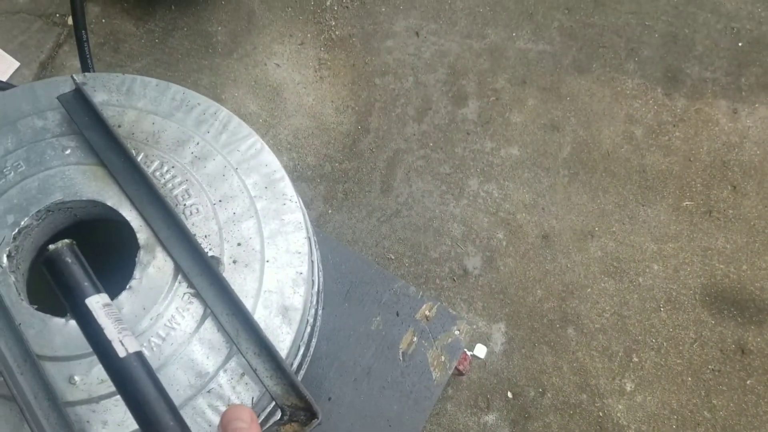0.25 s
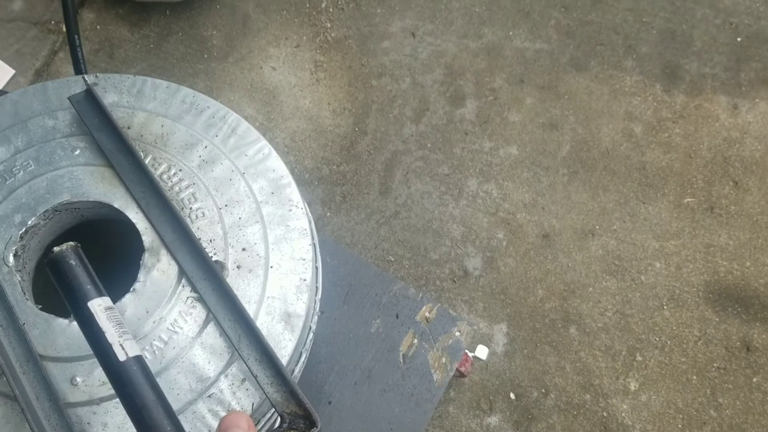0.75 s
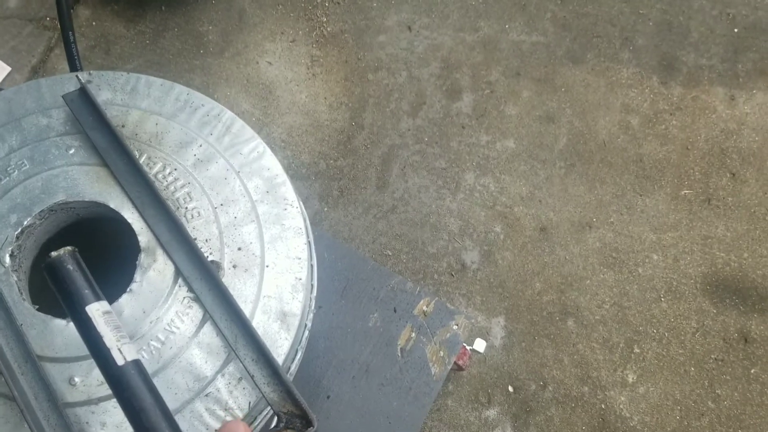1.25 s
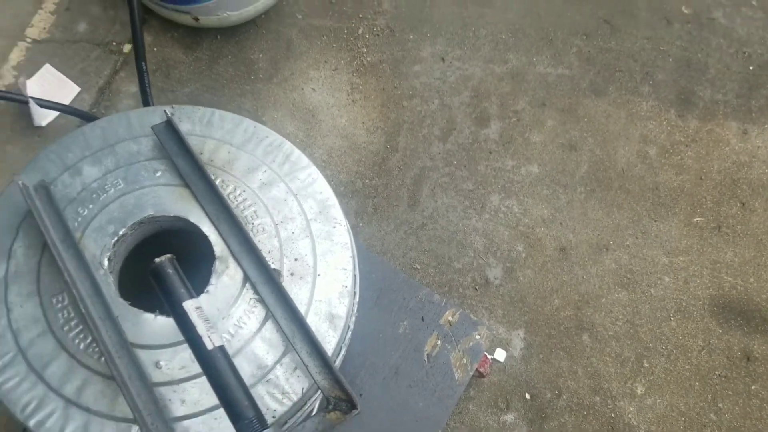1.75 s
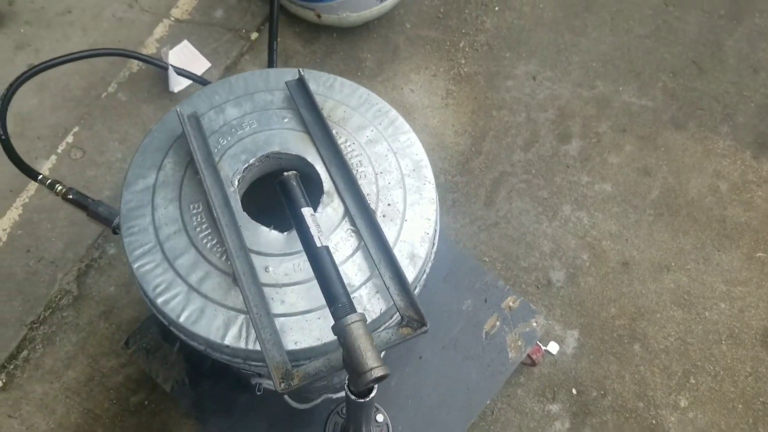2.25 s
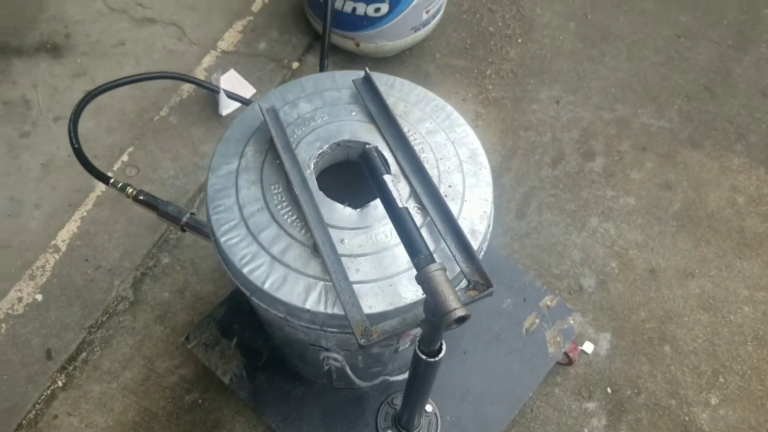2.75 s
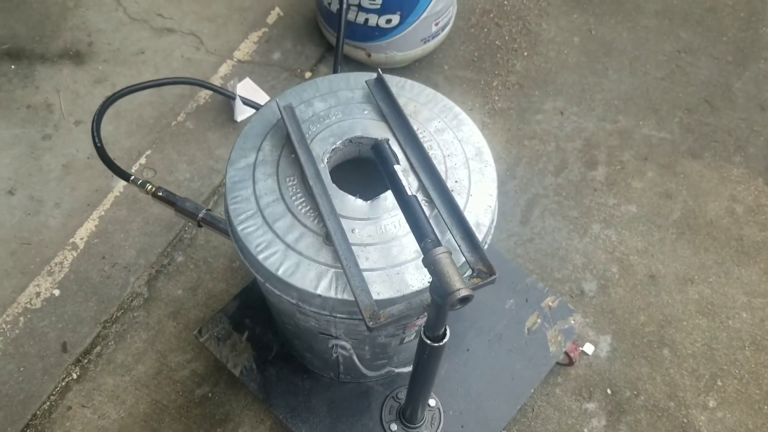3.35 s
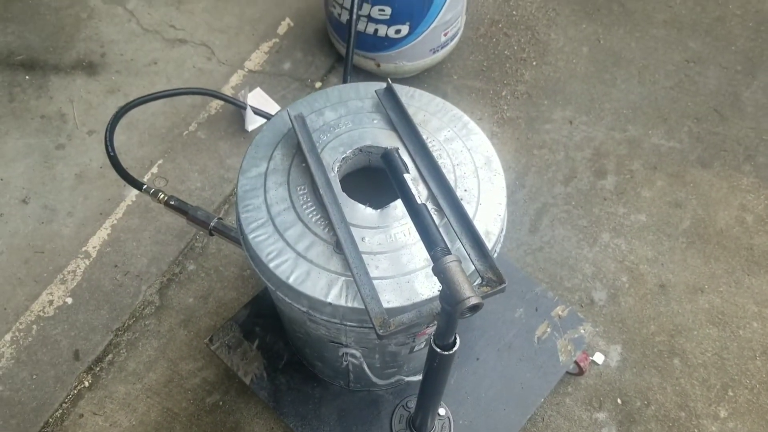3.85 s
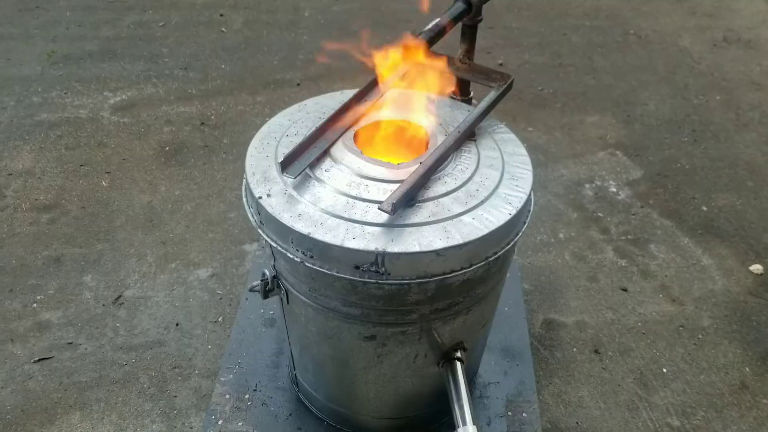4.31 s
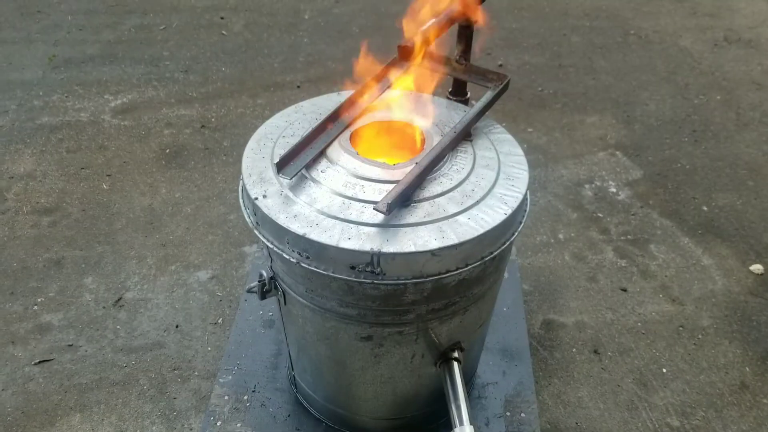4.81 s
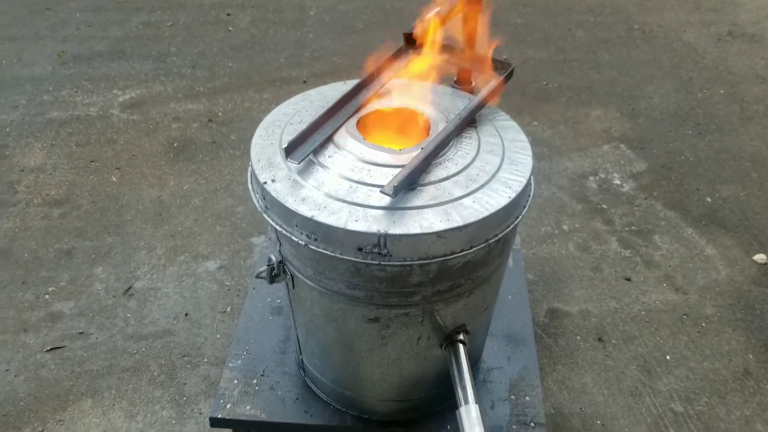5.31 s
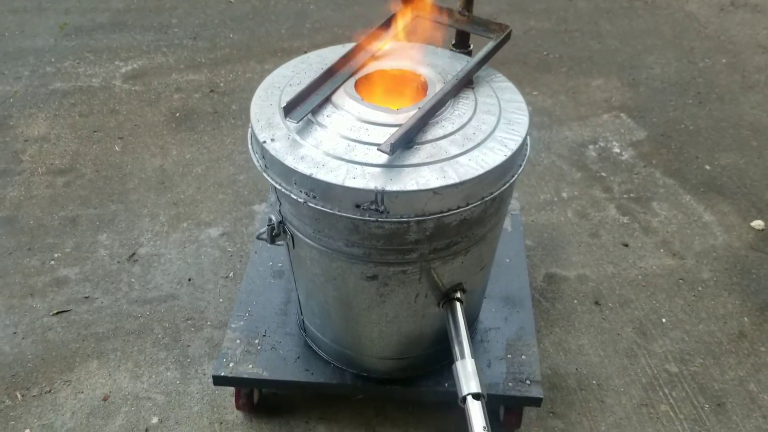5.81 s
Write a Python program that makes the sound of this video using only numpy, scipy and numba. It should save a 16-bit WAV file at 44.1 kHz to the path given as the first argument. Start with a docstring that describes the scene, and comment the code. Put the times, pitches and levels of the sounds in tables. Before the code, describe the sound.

A gas burner roars steadily inside a small metal drum furnace, hollow and low; shoes scuff concrete, then after a brief gap it roars brighter.

```python
"""A propane burner blows into a small insulated steel drum furnace outdoors, heard by a hand-held phone.
The first shot hears it from above: flame noise rings the drum's cavity over rumble, overtones, rush and jet hiss.
The phone steps back while shoes scuff the concrete, and a thin band of intake hiss comes up.
After a short silence the second shot hears the hotter furnace from the side.
Filtered noise makes every layer; the two ports differ in phase, level and scattered sound."""
import sys
import numpy as np
from scipy import signal
from scipy.fft import rfft, irfft, next_fast_len
from scipy.io import wavfile
from scipy.ndimage import uniform_filter1d, map_coordinates
from numba import njit

SR = 44100
rng = np.random.default_rng(int(sys.argv[2]) if len(sys.argv) > 2 else 0)


def waveform_to_disk(signal):
    """Save audio, clipped to [-1, 1], as 16-bit WAV at the path in sys.argv[1]."""
    frames = np.transpose(np.atleast_2d(signal))
    scaled = np.clip(frames, -1, 1) * 32767
    samples = np.round(scaled).astype(np.int16)
    wavfile.write(sys.argv[1], SR, samples)


N = 267687


def undb(db):
    """Level: decibels to an amplitude ratio."""
    return 10 ** (np.asarray(db) / 20)


def unit(x):
    """Normalization: scale to an rms of 1."""
    return x / np.sqrt(np.mean(x ** 2))


def read(table, hz):
    """Spectral interpolation: straight lines over logarithmic frequency."""
    points = np.array(table, float)
    return np.interp(np.log(np.maximum(hz, 1)), np.log(points[:, 0]), points[:, 1])


@njit
def svf(x, hz, width_hz):
    """Resonance: a state-variable band-pass with a moving centre, gain 1 there."""
    y, band, low = np.empty(len(x)), 0., 0.
    for i in range(len(x)):
        g = np.tan(np.pi * hz[i] / SR)
        damping = width_hz / hz[i]
        v = (band + g * (x[i] - low)) / (1 + g * (g + damping))
        band, low = 2 * v - band, low + 2 * g * v
        y[i] = damping * v
    return y


def resonate(ports, centre_hz, width_hz, passes):
    """Cascaded resonance: each pass steepens the skirts at both ports; the width is that of one pass."""
    centre = np.full(ports.shape[1], centre_hz, float)
    for _ in range(passes):
        ports = np.array([svf(port, centre, float(width_hz)) for port in ports])
    return ports


def walk(n, rate):
    """Slow random modulation: levels held 1 / rate s and slewed twice; spread 1."""
    hold = int(SR / rate)
    steps = np.repeat(rng.standard_normal(n // hold + 1), hold)
    slewed = uniform_filter1d(uniform_filter1d(steps, hold), hold)[:n]
    return slewed / slewed.std()


# Shoe scuffs; both levels are further weighted by the envelope's rms:
# (time [s], ring level [dB], length [s], ring centre [Hz], ring width of one pass [Hz],
#  rasp level [dB], left minus right [dB])
SCUFFS = [(1.780, -58, .003, 4500, 4000, -56, 0), (1.800, -55, .065, 2600, 3000, -64, -1),
          (1.814, -57, .008, 4000, 4000, -62, 0), (1.8355, -39, .004, 1800, 2200, -49, -2),
          (1.857, -60, .012, 4000, 4000, -60, -3), (2.237, -52, .004, 2500, 3000, -54, 1),
          (2.243, -67, .04, 7000, 4000, -62, 1), (2.7625, -46, .003, 2400, 2600, -62, -2),
          (2.758, -47, .021, 2520, 700, -66, -2), (2.770, -56, .009, 4550, 600, -66, -2),
          (2.773, -54, .005, 3300, 900, -66, -2), (2.8915, -36, .005, 1400, 900, -68, 2),
          (2.892, -42, .004, 2600, 900, -68, 2), (2.899, -47, .004, 2900, 1800, -54, 2),
          (2.901, -38, .009, 1550, 800, -57, 2), (2.914, -36, .024, 1500, 800, -58, 2),
          (2.918, -44, .016, 2550, 800, -64, 2), (2.918, -54, .03, 4400, 2500, -63, 1),
          (2.972, -53, .022, 1900, 1600, -70, 1)]


def scuffs():
    """Friction excitation: a sole drags over grit, uneven clicks with a ring and a bright rasp."""
    out, n = np.zeros((2, N)), SR // 5
    t = np.arange(n) / SR
    for s, ring_db, length, hz, width_hz, rasp_db, pan_db in SCUFFS:
        envelope = np.minimum(t / .001, 1) / (1 + (t / length) ** 4)
        grit = rng.standard_normal(n) + .7 * rng.standard_normal((2, n))  # shared plus each port's own
        grit = grit * undb(1.2 * rng.exponential(1, n))
        ring = envelope * resonate(grit, hz, width_hz, passes=2)
        rasp = envelope * resonate(grit, 5000, 4500, passes=1)
        pan = undb(np.array([[pan_db], [-pan_db]]) / 2)
        gain = pan * np.sqrt(np.mean(envelope ** 2))
        i = int(s * SR)
        out[:, i:i + n] += gain * (undb(ring_db) * unit(ring) + undb(rasp_db) * unit(rasp))
    return out


# Sound that reaches both ports straight from the furnace, one table a shot:
# (frequency [Hz], share of power [0-1])
DIRECT = [
    [(30, .92), (70, .97), (130, .99), (290, .985), (400, .8), (640, .8), (1400, .35), (3000, .5),
     (8000, .25), (15000, .15)],
    [(30, .94), (70, .98), (130, .995), (290, .995), (640, .92), (1400, .4), (2200, .7), (3000, .4),
     (8000, .25), (15000, .15)],
]
# Shading of the ports by the phone's body, one table a shot: (frequency [Hz], left minus right [dB])
SHADE = [
    [(60, 2), (110, 0), (200, -1), (380, 0), (700, 2), (1290, -3), (2380, -5), (4400, -2.5), (8120, -1),
     (15000, 1)],
    [(60, 1), (110, -5.5), (200, -3), (380, -2.5), (700, -3), (1290, -1), (2380, -8), (4400, -6.5),
     (8120, -4.5), (15000, -1.5)],
]


def eddies(n, shot):
    """Partial coherence: white turbulence as port spectra, a direct part in common and a scattered part."""
    hz = np.fft.rfftfreq(n, 1 / SR)
    share = read(DIRECT[shot], hz)
    direct, left, right = rfft(rng.standard_normal((3, n)))
    shade = undb(np.outer([.5, -.5], read(SHADE[shot], hz)))
    scattered = np.array([left, right])
    return hz, shade * (np.sqrt(share) * direct + np.sqrt(1 - share) * scattered)


def turbulence(n, shot, colour, shared_db, flicker_db, rate):
    """Turbulent noise: coloured octave bands share one level change and each flickers alone."""
    hz, noise = eddies(n, shot)
    lo, hi = colour[0][0], colour[-1][0]
    noise = noise * undb(read(colour, hz)) * (hz > lo / 2) * (hz < hi * 2)
    octave = np.clip(np.log2(np.maximum(hz, 1) / lo), 0, None)
    out = 0
    for k in range(int(np.log2(hi / lo)) + 2):
        band = np.clip(1 - abs(octave - k), 0, 1)  # triangles that overlap and sum to 1
        out = out + irfft(noise * band, n) * undb(shared_db + flicker_db * walk(n, rate))
    return unit(out)


def intake(n, shot, away):
    """Narrow-band noise: a thin band of hiss, heard once the burner pipe is in view."""
    hiss = irfft(eddies(n, shot)[1], n)
    hiss = unit(resonate(hiss, 3316, 200, passes=2))
    return np.sqrt(away) * undb(-66 + 1.8 * walk(n, 3)) * hiss


# Gas jet spectrum before levelling, one table a shot: (frequency [Hz], relative level per Hz [dB])
JET = [
    [(2800, -25.0), (3600, 0.0), (4300, -3.2), (5400, -5.6), (6500, -5.5), (7600, -4.5), (8800, -10.3),
     (10300, -6.7), (12200, -5.6), (14300, -6.4), (15000, -6.2), (15600, -3.3)],
    [(2800, -26), (3600, -1.5), (4200, -5.5), (4950, -10.5), (5500, -6.5), (6000, -3.5), (6700, -4),
     (7800, -5.5), (8800, -9.5), (10200, -4), (11300, -6.5), (12200, -2), (13200, -3.5), (14300, -3.5),
     (15600, 0)],
]


def jet(n, shot, flutter):
    """Jet noise: the gas stream mixes with air and hisses."""
    return turbulence(n, shot, JET[shot], 0.85 * flutter, 0.96, rate=9.2)


# Rush spectrum before levelling, one table a shot: (frequency [Hz], relative level per Hz [dB])
RUSH = [
    [(500, -18.5), (800, -8), (1250, -12), (2000, -13), (2600, -19.5), (3000, -23), (3600, -33.5),
     (4900, -59.5)],
    [(500, -0.5), (800, -22), (970, 5.5), (1130, -1), (1300, 1), (1600, 1), (1730, -0.5), (1860, 2),
     (2010, 5.5), (2095, -3.5), (2260, 3), (2380, 2), (2500, -4.5), (2800, -7.5), (3020, -6), (3250, -11.5),
     (3800, -34), (4900, -55)],
]


def rush(n, shot, flutter):
    """Broadband turbulence: the flame's rush in the middle of the spectrum."""
    return turbulence(n, shot, RUSH[shot], 0.81 * flutter, 1.0, rate=20)


# Overtone spectrum before levelling, one table a shot: (frequency [Hz], relative level per Hz [dB])
OVERTONES = [
    [(240, -37.5), (400, -23), (466, 2.5), (626, -2.5), (900, -19.5), (1170, -51.5), (1980, -120)],
    [(220, -12.5), (380, -7.5), (573, -10), (702, -15), (900, -15), (1170, -78), (1980, -120)],
]


def overtones(n, shot, flutter):
    """Upper resonances: flame noise with spectral peaks above the cavity's main ring."""
    return turbulence(n, shot, OVERTONES[shot], 0.53 * flutter, 1.0, rate=11)


# Rumble spectrum before levelling, one table a shot: (frequency [Hz], relative level per Hz [dB])
RUMBLE = [
    [(25, -36), (33, -24), (42, -12), (55, -4), (64, -7), (75, -1), (110, 0), (150, -3), (190, -3),
     (240, -8), (310, -35)],
    [(25, -38), (33, -26), (42, -14), (55, -5), (70, -4), (100, 0), (130, -5), (160, -8), (215, -2),
     (260, -10), (330, -35)],
]


def rumble(n, shot):
    """Combustion noise: low-frequency turbulence under the ring."""
    return turbulence(n, shot, RUMBLE[shot], 0, 0.46, rate=16)


# Cavity bandwidth, one value a shot: (width of one pass [Hz])
CAVITY_WIDTH_HZ = [111, 150]
# Cavity pitch that settles, one row a shot: (start [Hz], end [Hz])
CAVITY_HZ = [(303, 262.3), (314, 317)]
# Band cancelled by the bounce off the concrete, one row a shot:
# (centre [Hz], width [Hz], depth before the step back [0-1])
GROUND_DIP = [(388, 115, 0.8), (466, 73, 0)]
SETTLE_S = 0.44
DIP_LEFT = 0.59  # share of the dip that remains after the step back


def cavity(n, shot, s, away):
    """Cavity resonance: flame noise rings the air; pitch follows gas temperature and angle to the mouth."""
    start_hz, end_hz = CAVITY_HZ[shot]
    settling = np.exp(-((s - s[0]) / SETTLE_S) ** 2 / 2)
    ring_hz = end_hz + (start_hz - end_hz) * settling
    noise = irfft(eddies(n, shot)[1], n)
    ring = resonate(noise, ring_hz, CAVITY_WIDTH_HZ[shot], passes=3)
    dip_hz, dip_width_hz, depth = GROUND_DIP[shot]
    depth = depth * (1 - away * (1 - DIP_LEFT))
    ring = ring - depth * resonate(ring, dip_hz, dip_width_hz, passes=1)
    return unit(ring * undb(0.31 * walk(n, 17)))


# Right port's lag and loss beside the left, one row a shot: (lag [ms], left minus right [dB])
TURN = [(0.25, 0.6), (0.108, 3.5)]
# The same after the step back: (lag [ms], left minus right [dB])
FACING = (0.069, .2)
TURN_IN_S, TURN_START_MS = 0.46, 0.13  # the phone first turns aside


def aim(x, shot, s, away):
    """Interaural-style cues: a time lag and a level difference place the furnace between the ports."""
    aside_ms = np.interp(s, [0, TURN_IN_S], [TURN_START_MS, TURN[shot][0]])
    lag_ms = aside_ms + away * (FACING[0] - aside_ms)
    pan_db = TURN[shot][1] + away * (FACING[1] - TURN[shot][1])
    heard_at = np.arange(len(s)) - lag_ms * SR / 1000
    x[1] = map_coordinates(x[1], [heard_at], order=5, mode="wrap")
    return x * undb(np.array([pan_db, -pan_db]) / 2)


# Shot bounds, one row a shot: (start [s], end [s])
SHOTS_S = [(0, 4.1930), (4.2866, 6.07)]
# Swell of the roar before each layer's share, one table a shot: (time [s], level [dB])
SWELL = [
    [(0, -1), (.5, -1), (.9, 3), (1.4, 2.5), (2, 2.5), (2.6, -3.5), (2.9, 0), (3.3, -2.5), (3.6, 0),
     (3.85, -1.5), (4.19, 0.5)],
    [(4.29, 2), (4.6, -2), (5, -0.5), (5.6, 0.5), (6.07, -1.5)],
]
# Base levels, one row a shot: (cavity [dB], rumble [dB], overtones [dB], rush [dB], jet [dB])
LAYER_DB = [(-19, -27, -42, -46, -57), (-19.5, -25, -36.5, -41, -47.5)]
# Share of the swell, one row a shot: (cavity [ratio], rumble [ratio], overtones [ratio],
# rush [ratio], jet [ratio])
FOLLOW = [(1, 0.2, 0.28, 0.49, .1), (1, 0.3, 0.22, 0.23, .1)]
# Change after the step back: (cavity [dB], rumble [dB], overtones [dB], rush [dB], jet [dB])
FARTHER_DB = (-4, -2.5, -7.5, -2, -0.5)
# Wave value sought where each shot cuts into the roar, one value a shot: (amplitude [full scale])
CUT_IN = (0, -.2)
# Span after the roar's onset in which the cut is sought: (earliest [s], latest [s])
LEAD_S = (.04, .07)
STEP_BACK_S, STEP_LENGTH_S = 1.19, 0.89
CUT_OUT_S = .001  # each shot ends in a quick fade


def furnace(shot):
    """Superposition: the burner layers of one shot add, and distance and swell set their levels."""
    start, end = int(SHOTS_S[shot][0] * SR), min(int(SHOTS_S[shot][1] * SR), N)
    length = end - start
    early, late = (int(v * SR) for v in LEAD_S)
    n = next_fast_len(length + late)
    s = (start - (early + late) // 2 + np.arange(n)) / SR
    step = np.clip((s - STEP_BACK_S) / STEP_LENGTH_S, 0, 1)
    away = (shot == 0) * np.sin(np.pi / 2 * step) ** 2  # 0 near, 1 after the step back
    swell_db = np.interp(s, *np.transpose(SWELL[shot]))
    ring_gain, rumble_gain, over_gain, rush_gain, jet_gain = (
        undb(db + share * swell_db + far_db * away)
        for db, share, far_db in zip(LAYER_DB[shot], FOLLOW[shot], FARTHER_DB))
    flutter = walk(n, 18)  # the flame front flaps and moves the upper layers together
    x = intake(n, shot, away)
    x += jet_gain * jet(n, shot, flutter)
    x += rush_gain * rush(n, shot, flutter)
    x += over_gain * overtones(n, shot, flutter)
    x += rumble_gain * rumble(n, shot)
    x += ring_gain * cavity(n, shot, s, away)
    x = aim(x, shot, s, away)
    # cut in where the wave is near the sought value and nearly flat
    mid = x[:, early:late].mean(axis=0)
    cut = early + np.argmin(abs(mid - CUT_IN[shot]) + 10 * abs(np.gradient(mid)))
    fade = np.minimum(np.arange(length)[::-1] / (CUT_OUT_S * SR), 1)
    out = np.zeros((2, N))
    out[:, start:end] = x[:, cut:cut + length] * fade
    return out


def scene():
    """Superposition: the shoe scuffs and both shots of the furnace."""
    return scuffs() + furnace(0) + furnace(1)


def record(dry):
    """Band limiting: the phone cuts the top of the treble with a steep elliptic low-pass."""
    top_hz = 15740
    return signal.sosfilt(signal.ellip(12, .2, 60, top_hz, fs=SR, output="sos"), dry)


dry = scene()
out = record(dry)
waveform_to_disk(out)
```